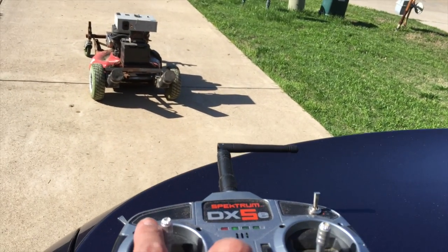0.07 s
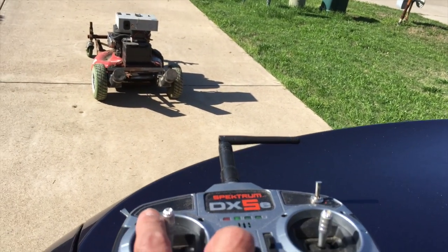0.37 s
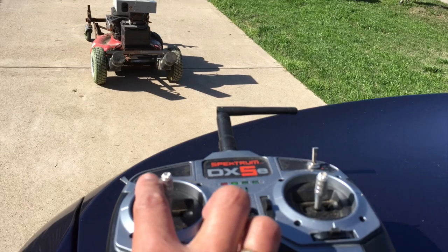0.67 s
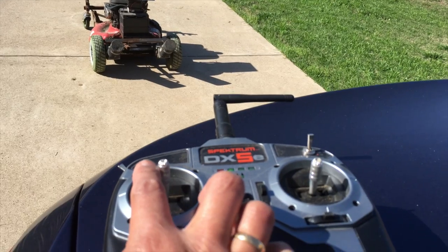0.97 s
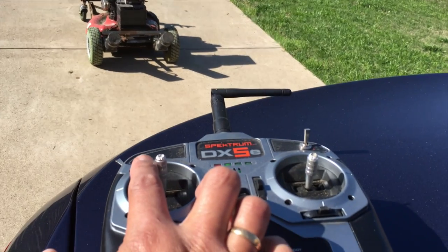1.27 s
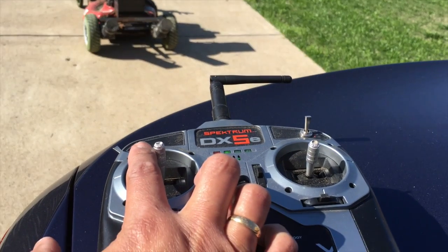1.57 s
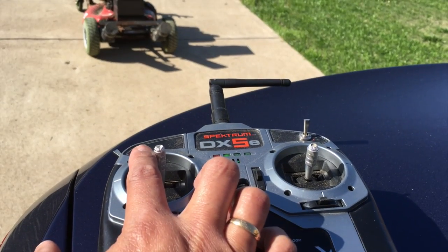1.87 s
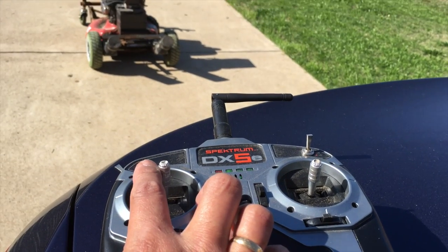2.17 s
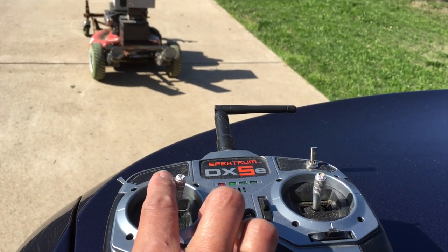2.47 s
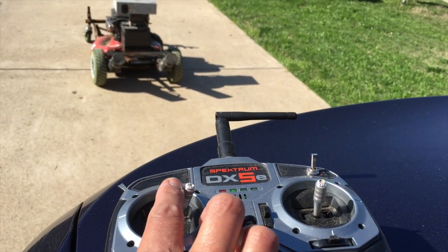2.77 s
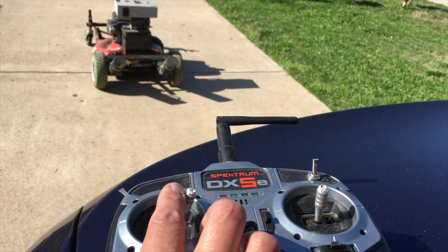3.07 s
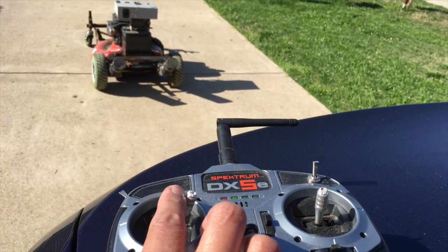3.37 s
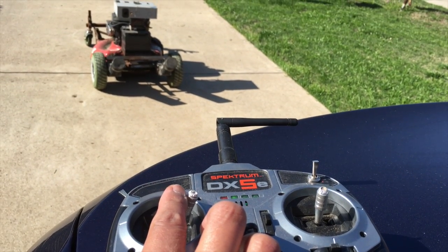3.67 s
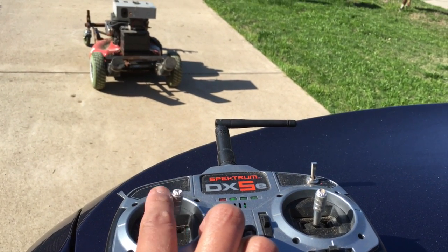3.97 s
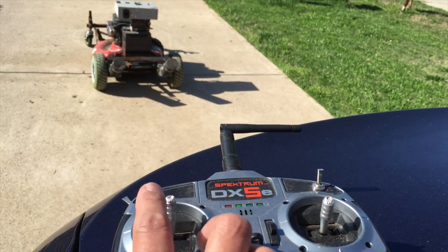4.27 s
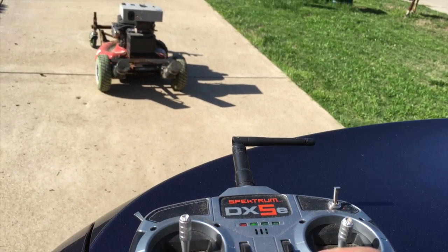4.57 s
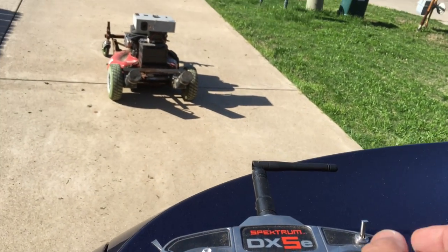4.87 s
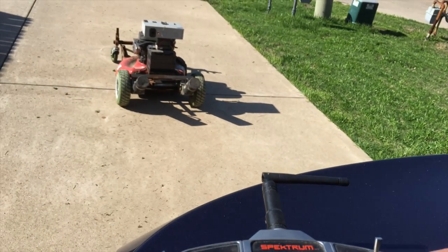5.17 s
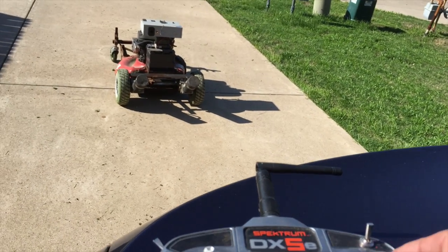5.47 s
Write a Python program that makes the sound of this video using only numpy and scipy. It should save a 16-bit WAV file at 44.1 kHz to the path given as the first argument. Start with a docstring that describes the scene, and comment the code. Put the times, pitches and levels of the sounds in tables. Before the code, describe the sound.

A lawn mower starts up outdoors: a quiet low drone, a clunk and rattling cranking, then sharp firings and a steady engine roar.

```python
"""A driveway, one microphone a few metres from a remote-controlled mower, a low drone behind it.
At 2.6 s the solenoid clicks, the pinion clunks in and the starter whines up and cranks with a rattle.
At 3.7 s the four-stroke engine catches with a few sharp firings, overshoots and settles at governed
speed: exhaust through the muffler, knocks in the block, fan roar and valve clatter.
House fronts and fences return a faint echo."""
import sys
import numpy as np
from scipy import signal
from scipy.fft import rfft, irfft, next_fast_len
from scipy.io import wavfile
from scipy.ndimage import uniform_filter1d

SR = 44100
rng = np.random.default_rng(int(sys.argv[2]) if len(sys.argv) > 2 else 0)


def to_wav(sig):
    """Store sig (one row per channel, or 1-D mono) as 16-bit WAV at the path in sys.argv[1].

    Samples outside -1..1 are clipped; the rate is SR.
    """
    pcm = np.clip(np.atleast_2d(sig), -1, 1) * 32767
    pcm = np.round(pcm).astype(np.int16)
    wavfile.write(sys.argv[1], SR, pcm.T)  # frames by channels


N = 243431
T = np.arange(N) / SR
SPIN_S, CATCH_S = 2.685, 3.72  # the starter spins up; the engine catches
GOVERNED_TURNS_PER_S, FIRING_PLACE = 50.4, .075  # place within the cycle, 0-1

# exhaust at governed speed: t/s, level/dB
EXHAUST_LEVEL = [(4.0, -21), (4.85, -21), (5.1, -22.5), (5.5, -20.5)]
# block knocks and valve-gear strikes: place in the cycle (0-1), level/dB
KNOCK_PATTERN = [(.01, -14.5), (.26, -15.5), (.51, -15), (.76, -18)]
VALVE_PATTERN = [(0.039, 2), (.11, -18), (0.192, 6), (.3, 8.5), (0.558, 3.5), (.62, -22), (.77, 3.5),
                 (.86, 10)]
# spectra of the knocks, the cooling fan and the valve clatter: f/Hz, level/dB
KNOCK_SPECTRUM = [(20, -65), (200, -8), (450, -4), (620, 0), (800, -16.5), (895, 8.5), (1120, 4.5),
                  (1300, -9), (1550, -9), (2400, -8.5), (4000, -31), (8000, -36)]
FAN_SPECTRUM = [(15, -28), (30, -10), (55, 2), (150, -15.5), (300, 4.5), (450, -4), (800, -1), (1020, 5.5),
                (1350, -0.5), (2400, -6), (3600, -8), (4900, -14), (7000, -13), (16000, -23.5)]
CLATTER_SPECTRUM = [(1500, 2.5), (4500, -31.5), (7000, -1.5), (9500, 3), (13000, 0.5), (16000, -8)]
# resonances of the block and shroud, and of the valve gear: f/Hz, width/Hz, level/dB
BLOCK_RINGS = [(1345, 50, 1), (1525, 19, 8.5), (1920, 55, 1), (1964, 56, 4.5), (2206, 34, 5.5),
               (2362, 20, 11), (2460, 45, 4.5), (3100, 300, 2), (3900, 140, 4), (4270, 160, 6),
               (4560, 70, 5.5), (5150, 220, 4.5), (5580, 220, 7.5), (6150, 86, 7.5), (6760, 130, 5),
               (7000, 300, 1.5)]
VALVE_RINGS = [(8790, 390, 8.5), (10600, 86, 6), (11150, 120, -14), (11110, 70, 21), (12200, 580, 7.5),
               (13000, 73, 12)]
def engine():
    """A few metres off: exhaust, block knocks, fan roar and valve clatter, all on one crankshaft."""
    speed, cycles = crankshaft()
    speed_db = 12.5 * np.log2(speed / GOVERNED_TURNS_PER_S)  # louder with each doubling of speed
    exhaust_db, = curves(EXHAUST_LEVEL)
    rough = np.clip((4.24 - T) / .097, 0, 1)  # combustion is ragged until the engine is up to speed
    hits = strikes(cycles, KNOCK_PATTERN, scatter_db=1.3, jitter_s=.00004)
    knocks = colour(evened(hits) + .22 * rattle(hits, decay_s=.0073), KNOCK_SPECTRUM, BLOCK_RINGS)
    fan = colour(noise() * amp(.92 * wander(86)), FAN_SPECTRUM, BLOCK_RINGS)
    ticks = strikes(cycles, VALVE_PATTERN, scatter_db=1.6, jitter_s=.0003)
    clatter = colour(rattle(ticks, decay_s=.0057), CLATTER_SPECTRUM, VALVE_RINGS + BLOCK_RINGS)
    clatter_db = -7.5 - 3 * rough  # the valves seat harder at speed
    machinery = amp(-9) * knocks + amp(.24) * fan + amp(clatter_db) * clatter
    tailpipe = amp(exhaust_db) * exhaust(cycles, speed, rough)
    return ramp(CATCH_S, .037) * amp(speed_db) * (tailpipe + amp(-28) * machinery)

# run-up, overshoot and slight hunting: t/s, speed/(turns per s)
CRANK_SPEED = [(3.72, 20.1), (4.104, 47.9), (4.244, 52.8), (4.404, 49.9), (4.769, 51), (4.967, 50.5),
               (5.223, 49.4), (5.52, 50.9)]
def crankshaft():
    """Speed, and the running count of four-stroke cycles (two turns each) once the engine catches."""
    speed, = curves(CRANK_SPEED)
    return speed, FIRING_PLACE + np.cumsum(speed * (T > CATCH_S)) / SR / 2

# exhaust note: multiple of the cycle rate, level/dB
EXHAUST_ORDERS = [(1, -39), (2, -12), (3, -16.5), (4, -0.5), (5, -8), (6, -6.5), (7, -17.5), (8, 1),
                  (9, -13.5), (10, -24), (11, -30.5), (12, 2), (13, -21), (14, -31), (15, -27), (16, -4.5),
                  (17, -35), (18, -26), (19, -29.5), (20, -18), (21, -25), (22, -27), (23, -36), (24, -11)]
# what the muffler lets through: f/Hz, level/dB
MUFFLER = [(15, -35), (50, -15), (75, 6), (100, 2.5), (150, -5), (220, 2.5), (290, -2), (400, -3.5),
           (500, -19), (600, -4), (900, -38), (4000, -70)]
def exhaust(cycles, speed, rough):
    """Orders of the cycle glide through the muffler's resonances; uneven burning adds puffs of noise."""
    orders, levels_db = np.transpose(EXHAUST_ORDERS)
    mirrored = np.log(amp(np.r_[levels_db[0], levels_db, levels_db[-2::-1]]))
    lags = np.imag(signal.hilbert(mirrored))[1:len(orders) + 1]  # the pipe delays each order
    uneven_cycles = cycles - .25 + (.0012 + .003 * rough) * wander(40)
    note = np.zeros(N)
    for k, db, lag in zip(orders, levels_db, lags):
        muffler_db = level_at(MUFFLER, k * speed / 2) - level_at(MUFFLER, k * speed[-1] / 2)
        note -= amp(db + muffler_db) * np.cos(2 * np.pi * k * uneven_cycles - lag)
    puffs = colour(noise(), MUFFLER)
    steady_rms = np.sqrt(np.mean(note[rough == 0] ** 2))
    return note / steady_rms * amp((.5 + rough) * wander(30)) + .45 * rough * puffs

# crack of a hard firing: f/Hz, level/dB
CRACK_SPECTRUM = [(290, -10), (500, -7), (678, -12), (1180, -1.5), (2500, -9), (3590, 0), (5800, -6.5),
                  (11300, -2.5), (14900, -9), (16000, -6.5)]
def hard_firings(count=9, thump_hz=78, swell_s=.008):
    """The first cycles fire hard: each a bright crack, then a low thump from the muffler."""
    out, t = np.zeros(N), np.arange(SR // 8) / SR
    thump = -np.sin(2 * np.pi * thump_hz * t) * (t / swell_s) * np.exp(1 - t / swell_s)
    _, cycles = crankshaft()
    for s in T[np.searchsorted(cycles, FIRING_PLACE + np.arange(count), side="right")]:
        crack_db = -20 - 3 * ((s - 3.945) / .22) ** 2  # loudest in mid run-up
        thump_db = -22.5 - 23 * (s - CATCH_S)  # dies away as speed builds
        crack = colour(burst(rise_s=.0013, t60=.045, grain_db=2), CRACK_SPECTRUM, tilt_db=-.1)
        add(out, s, amp(crack_db) * crack)
        add(out, s + .0028, amp(thump_db) * thump)
    snap = colour(burst(rise_s=.0014, t60=.027, grain_db=2.5), CRACK_SPECTRUM, tilt_db=7.5)
    add(out, 4.283, amp(-14) * snap)  # once, at the top of the overshoot
    return out

def starter():
    """The starter cranks with a whine, a groan and grinding, and fades once the engine has caught."""
    engaged = np.interp(T, [2.615, 2.623, 3.85, 4.05], [0, 1, 1, 0])
    return engaged * (gear_whine() + load_groan() + gear_grind())

# partials of the meshing teeth: multiple of the mesh rate, level/dB
MESH_PARTIALS = [(1, -.5), (2, -2), (3, 0), (4, -9), (5, -16)]
# resonances of the starter housing: f/Hz, width/Hz, level/dB
HOUSING_RINGS = [(1033, 56, 11), (1580, 150, 3.5), (1960, 110, 1), (2830, 52, 2), (3150, 140, 8),
                 (3400, 110, 1.5), (3670, 57, 10), (4080, 130, 10), (5175, 420, 16.5), (5630, 120, 10.5),
                 (6130, 390, 11), (6480, 160, 8)]
def gear_whine(start_hz=880, top_hz=1725, loud_db=-39.5, trace_db=-63):
    """Meshing teeth sing through the housing, loud while they spin up, then only a trace."""
    mesh_hz = start_hz + (top_hz - start_hz) * np.sin(np.pi / 2 * ramp(SPIN_S, .205)) ** 2
    whine_db = trace_db + (loud_db - trace_db) * envelope(SPIN_S, attack=.064, hold=.14, release=.045)
    teeth = phase(mesh_hz)
    # worn teeth make each partial flutter on its own
    mesh = sum(amp(db + 3 * wander(70)) * np.sin(k * teeth + .95 * wander(200))
               for k, db in MESH_PARTIALS)
    # f/Hz, level/dB
    spectrum = [(1100, 0), (1800, -7), (3000, 0), (4300, 0), (5200, -3), (6400, -4), (7200, -15)]
    return amp(whine_db) * evened(colour(mesh, spectrum, HOUSING_RINGS))

def load_groan(free_hz=634, sag_hz=81.56, load_s=2.8, throb_hz=12.3):
    """The starter sags in pitch and swells under load, then throbs once a crank turn as it recovers."""
    load = 1 / (1 + ((T - load_s) / np.where(T < load_s, .045, .11)) ** 2)
    angle = phase((free_hz - sag_hz * load) * (1 + .0305 * wander(75)))
    depth = ramp(2.83, .13)
    throb = amp(9 * depth * np.cos(2 * np.pi * throb_hz * (T - 3.2))) / (1 + .6 * depth)
    groan = amp(-49.5 + 13.5 * load ** 2) * throb * np.sin(angle)
    # a hum an octave below comes up shortly before the engine catches
    hum = amp(-55 + 7.5 * ramp(3.25, .19) + 3 * wander(20)) * np.sin(angle / 2)
    return ramp(SPIN_S, .064) * (groan + hum)

# grinding gears: f/Hz, level/dB
GRIND_SPECTRUM = [(180, -2.5), (300, -1.5), (502, -13), (614, -6), (713, -2.5), (1040, -6), (1560, -0.5),
                  (2570, -7.5), (3190, -10), (4590, -13), (5160, -22), (7690, -20), (14200, -25.5),
                  (16000, -23)]
def gear_grind():
    """The gears grind hardest during the first turns of the crank and brighten as they gather speed."""
    grind_db = -42.5 + 4 * envelope(SPIN_S, attack=.13, hold=.4, release=.16)
    scrape = noise() * amp(grind_db + 1.8 * wander(200) + 1.2 * wander(25))
    bright = colour(scrape, GRIND_SPECTRUM, HOUSING_RINGS)
    dull = colour(scrape, GRIND_SPECTRUM, HOUSING_RINGS, tilt_db=-2)
    spun_up = ramp(SPIN_S, .59)
    return spun_up * bright + (1 - spun_up) * dull

# blows of solenoid, pinion and gear teeth: t/s, level/dB, tilt/(dB per octave), t60/s
STARTER_BLOWS = [(2.621, -46, 0.5, 0.03), (2.653, -20.5, -4.5, 0.091), (2.716, -30, -6, 0.079),
                 (2.93, -28.5, -16, 0.17), (2.942, -37.5, 3.5, 0.093), (2.972, -33, 0, 0.063),
                 (3.085, -31.5, 0, 0.068), (3.148, -27.5, -1, 0.069), (3.191, -34, 0.5, 0.28),
                 (3.229, -27.5, 0, 0.11), (3.271, -39, 12, 0.059), (3.376, -42.5, 6, 0.1),
                 (3.599, -36, 9, 0.092)]
# one blow: f/Hz, level/dB
CLANK_SPECTRUM = [(150, -5.5), (500, -15.5), (800, -10), (1100, 0.5), (1400, 3), (1800, 1), (2500, -3),
                  (6000, -14), (7500, -13), (16000, -23.5)]
def clanks():
    """Steel strikes steel and rings the starter housing."""
    out = np.zeros(N)
    for s, db, tilt_db, t60 in STARTER_BLOWS:
        blow = burst(rise_s=.0013, t60=t60, grain_db=-1.5)
        add(out, s, amp(db) * colour(blow, CLANK_SPECTRUM, HOUSING_RINGS, tilt_db))
    return out

def driveway(direct, gap_s=.012, t60=.34):
    """The mower reaches the microphone directly, then faintly off house fronts and fences."""
    t = np.arange(SR // 2) / SR
    echoes = noise(len(t)) * (t > gap_s) * np.exp(-np.log(1000) * t / t60)
    tail = signal.oaconvolve(direct, echoes / np.linalg.norm(echoes))[:N]
    return direct + amp(-16.5) * colour(tail, [(150, -4), (600, -5), (3000, -9), (12000, -10)])

# the drone's two tones: f/Hz, width/Hz, level/dB
DRONE_TONES = [(56.9, 3.5, -4), (91.2, 2.7, 1.5)]
# its swells and dips: t/s, level/dB
DRONE_LEVEL = [(0.0, -35.5), (1.0, -34.5), (1.55, -43), (1.7, -58), (1.82, -35.5), (2.15, -35.5),
               (2.5, -39.5), (2.8, -34), (2.88, -53), (3.15, -33), (3.4, -40.5), (3.62, -33), (3.7, -49)]
def far_drone():
    """Two low tones waver in pitch and level, like an engine in the distance."""
    drone_db, = curves(DRONE_LEVEL)
    tones = sum(amp(db + 2.5 * wander(3.9)) * np.sin(phase(hz + width / 2 * wander(7.4)))
                for hz, width, db in DRONE_TONES)
    return amp(drone_db + 2 * wander(8.9)) * evened(tones)

# outdoor rumble, soft air and far-off rush: f/Hz, level/dB
RUMBLE_SPECTRUM = [(15, -30), (30, -20), (45, -3), (70, 8.5), (125, 3), (165, 1.5), (200, -3.5),
                   (240, -4.5), (310, -11.5), (400, -18), (700, -61.5), (5000, -87)]
AIR_SPECTRUM = [(200, -33), (400, -5.5), (520, -8.5), (850, 0), (1250, -6.5), (1600, -9), (2300, -17.5),
                (2800, -27), (3700, -27.5), (5000, -34), (6700, -35), (8000, -40.5), (16000, -49.5)]
RUSH_SPECTRUM = [(150, -8), (240, 2), (450, -12), (780, 3), (1180, 3), (1650, -13.5), (2350, -14.5),
                 (2750, -20.5), (6000, -32), (12000, -50)]
def open_air():
    """Rumble and soft air all around; far off, a rush swells until just before the starter engages."""
    rumble = amp(-41 + 1.3 * wander(9)) * colour(noise(), RUMBLE_SPECTRUM)
    air = amp(-55 + .5 * wander(25)) * colour(noise(), AIR_SPECTRUM)
    rush = amp(-50) * ramp(1.04, 1.46) * colour(noise(), RUSH_SPECTRUM)
    return rumble + air + rush

# taps: t/s, level/dB
NEAR_TAPS = [(1.327, -48.5), (1.678, -44), (1.876, -43), (2.01, -48), (2.204, -46), (2.404, -42)]
# one tap: f/Hz, level/dB
TAP_SPECTRUM = [(200, -12), (500, -6), (1100, 14), (1600, -9), (4000, -25), (12000, -44)]
def near_taps():
    """A few faint taps close to the microphone before the mower starts."""
    out = np.zeros(N)
    for s, db in NEAR_TAPS:
        add(out, s, amp(db) * colour(burst(rise_s=.002, t60=.063, grain_db=-3), TAP_SPECTRUM))
    return out

# hiss around the squeal: f/Hz, level/dB
HISS_SPECTRUM = [(1500, -29), (2900, 4), (4000, 0), (5000, -12), (7000, -13), (12000, -17), (16000, -25)]
def squeal(top_s=.21, half_width_s=.31):
    """Barely audible at the start: one arch of pitch in two high, flickering partials, with some hiss."""
    arch = 1 - ((T - top_s) / half_width_s).clip(-1, 1) ** 2
    angle = phase(1830 + 700 * arch + 16 * wander(120))
    whistle = sum(amp(-84 + 6 * wander(25)) * np.sin(k * angle) for k in (4, 5))
    hiss = amp(-74.5) * colour(noise(), HISS_SPECTRUM)
    return np.sqrt(arch) * whistle + arch * hiss

def strikes(cycles, pattern, scatter_db, jitter_s):
    """One impulse at each listed place of every engine cycle, uneven in strength and timing."""
    out = np.zeros(N)
    for place, db in pattern:
        size, late = noise((64, 2)).T
        s = np.interp(np.arange(64) + place, cycles, T, left=-1, right=-1)
        at = np.round((s + jitter_s * late) * SR).astype(int)
        heard = (at > 0) & (at < N)
        out[at[heard]] += amp(db + scatter_db * size[heard])
    return out

def rattle(hits, decay_s):
    """Each impulse sets off a dying rattle."""
    power = signal.lfilter([1], [1, -np.exp(-2 / (decay_s * SR))], hits ** 2)
    return evened(np.sqrt(power) * noise())

def burst(rise_s, t60, grain_db):
    """A dense, grainy cluster of impacts that swells and dies."""
    t = np.arange(SR // 4) / SR
    shape = (1 - np.exp(-(t / rise_s) ** 2)) * np.exp(-np.log(1000) * t / t60)
    grains = amp(grain_db * evened(uniform_filter1d(noise(len(t)), size=16)))
    return shape / shape.max() * evened(grains * noise(len(t)))

def colour(x, spectrum, rings=(), tilt_db=0):
    """Causal filter of unit energy: a broad spectrum, resonances on top, a tilt per octave."""
    hz = np.abs(np.fft.fftfreq(4096, 1 / SR)) + 1
    gain = amp(level_at(spectrum, hz) + tilt_db * np.log2(np.maximum(hz, spectrum[0][0])))
    for centre, width, ring_db in rings:
        gain *= amp(ring_db / (1 + (2 * (hz - centre) / width) ** 2))
    response = np.fft.ifft(np.exp(np.conj(signal.hilbert(np.log(gain))))).real
    return signal.oaconvolve(x, response / np.linalg.norm(response))[:len(x)]

def wander(hz):
    """Smooth random drift of unit rms, rolling off above hz."""
    size = next_fast_len(N)
    f = np.fft.rfftfreq(size, 1 / SR)
    return evened(irfft(rfft(noise(size)) * np.exp(-(f / hz) ** 2), size)[:N])

def level_at(spectrum, hz):
    """A spectrum's level in dB, interpolated on a log-frequency axis."""
    f, db = np.transpose(spectrum)
    return np.interp(np.log(hz), np.log(f), db)

def curves(rows):
    """Each column of a table, joined by straight lines in time."""
    s, *columns = np.transpose(rows)
    return [np.interp(T, s, c) for c in columns]

def ramp(start, length):
    """Rises from 0 to 1 over the given seconds."""
    return np.clip((T - start) / length, 0, 1)

def envelope(start, attack, hold, release):
    """Rises to 1, holds and falls to 0; times in seconds."""
    return ramp(start, attack) - ramp(start + attack + hold, release)

def phase(hz):
    """Running phase of a gliding pitch, in radians."""
    return 2 * np.pi * np.cumsum(hz) / SR

def noise(size=N):
    """White noise."""
    return rng.standard_normal(size)

def amp(db):
    """Decibels to gain."""
    return 10 ** (np.asarray(db) / 20)

def evened(x):
    """Scales to unit rms."""
    return x / np.sqrt(np.mean(x ** 2) + 1e-20)

def add(mix, s, sound):
    """Mixes a sound in at time s."""
    part = mix[round(s * SR):][:len(sound)]
    part += sound[:len(part)]

def scene():
    """The mower on the driveway and its surroundings, in mono from one spot."""
    mower = engine() + hard_firings() + starter() + clanks()
    return (driveway(mower) + far_drone() + open_air() + near_taps() + squeal())[None]

def record(dry):
    """The recorder behind the microphone cuts off steeply at 15.85 kHz."""
    lowpass = signal.firwin(801, 15850, window=("kaiser", 9), fs=SR)
    return signal.oaconvolve(dry, lowpass[None], "same")

dry = scene()
out = record(dry)
to_wav(out)
```